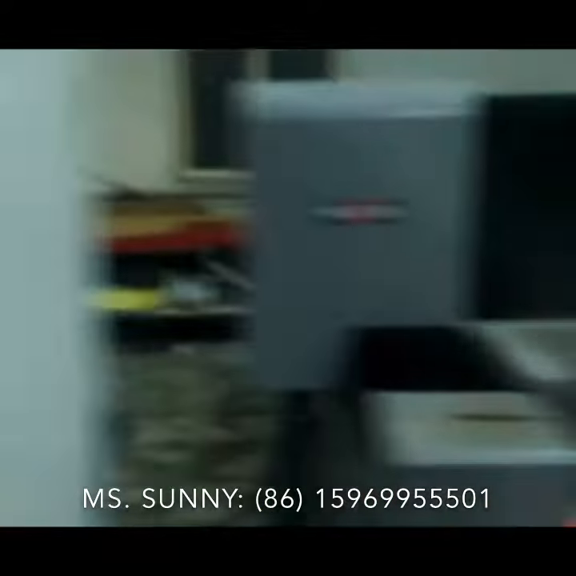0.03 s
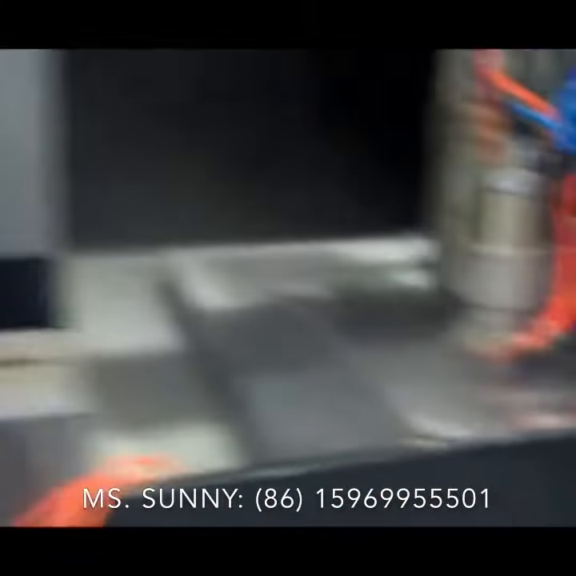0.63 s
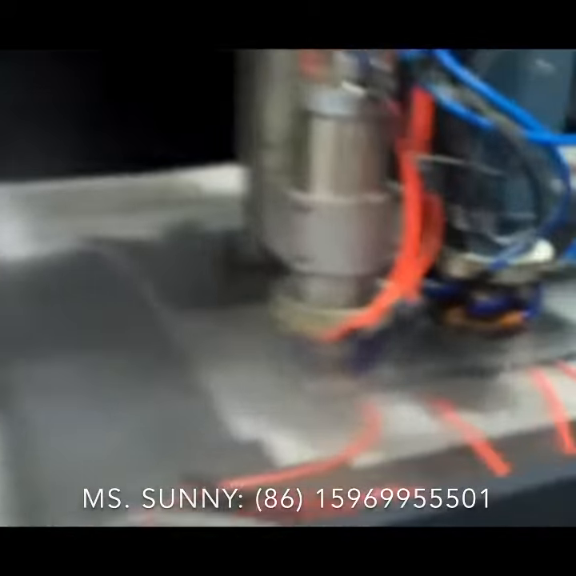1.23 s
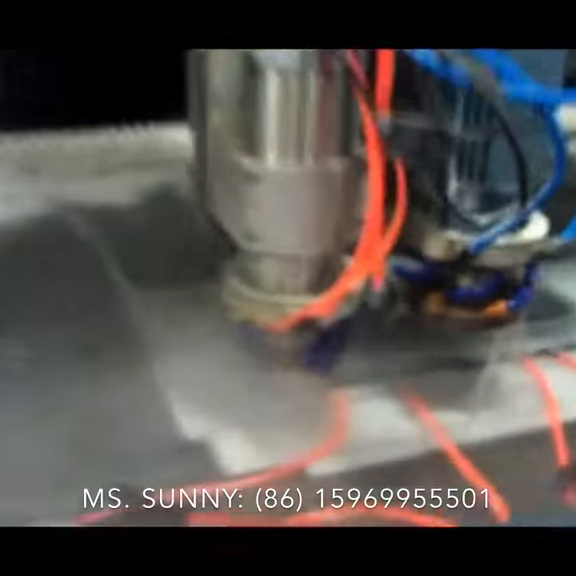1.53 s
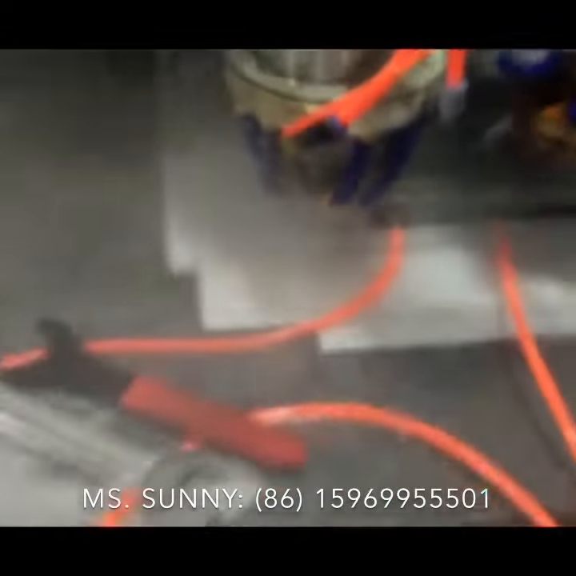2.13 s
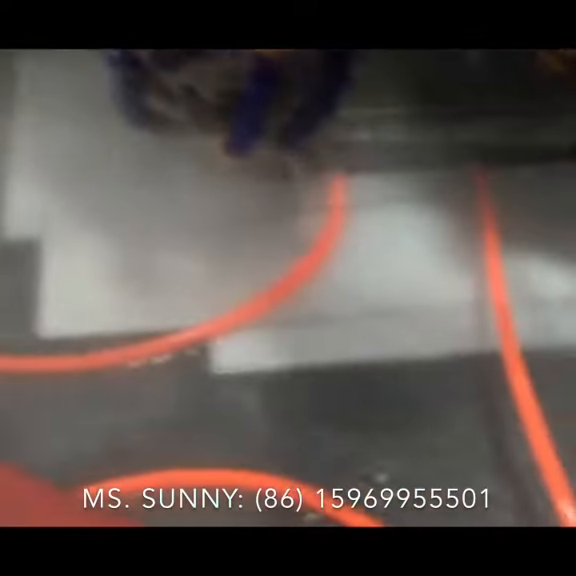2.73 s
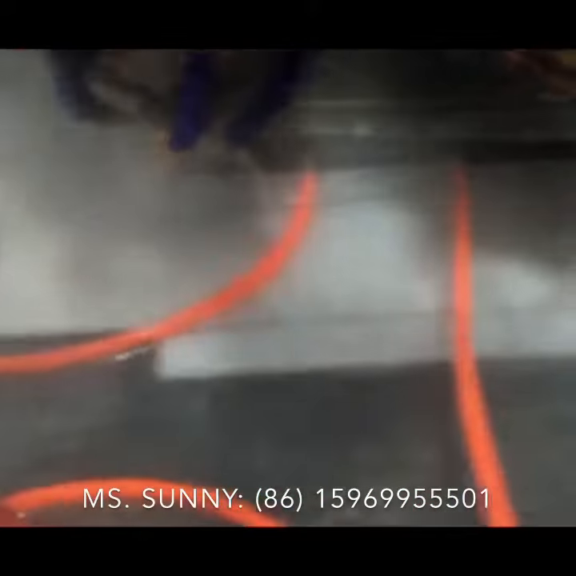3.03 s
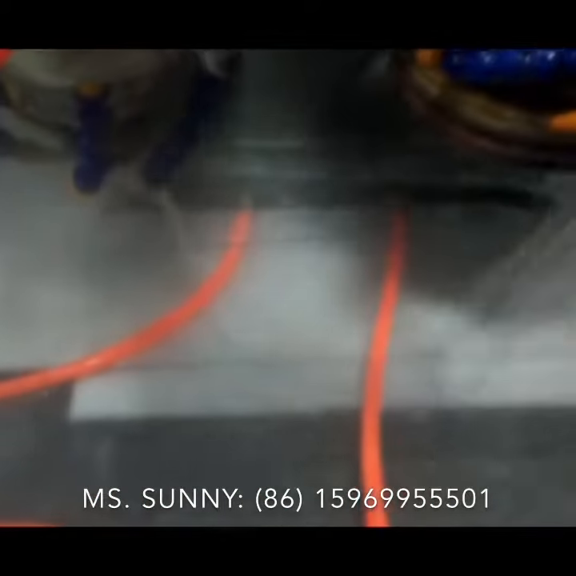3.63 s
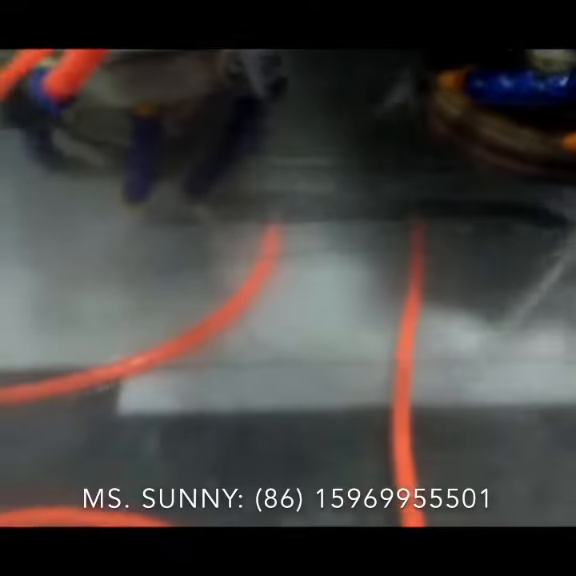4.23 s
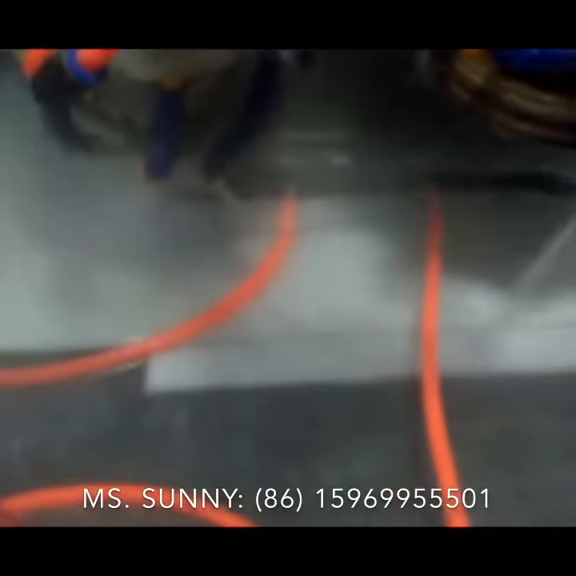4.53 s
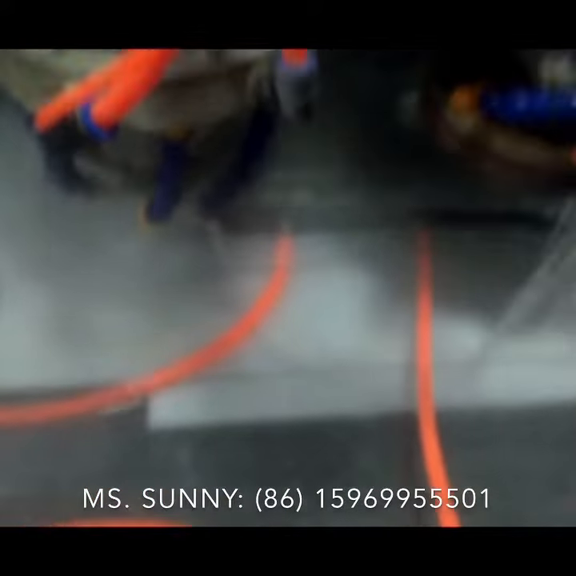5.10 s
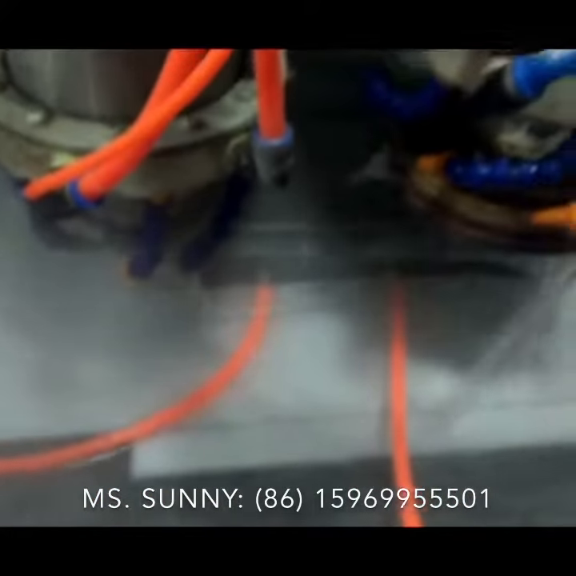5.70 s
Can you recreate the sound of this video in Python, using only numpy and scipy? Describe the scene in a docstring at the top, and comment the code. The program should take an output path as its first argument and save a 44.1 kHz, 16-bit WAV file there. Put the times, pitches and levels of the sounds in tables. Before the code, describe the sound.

A waterjet cuts a glass sheet in a workshop, heard for about six seconds through a hand-held microphone moving in towards the cutting head. A loud, bright hiss runs from start to end, becoming fuller and sharper between 0.2 and 0.8 seconds. Many narrow, high whistles flutter within it, and single ones swell into squeals at different pitches, most clearly around 0.2, 0.9, 1.4 and 2.2 seconds, again near 3.8, and in a cluster from 5 seconds on. Spent water churns under the sheet, faint at first and rising from about 1 to 1.4 seconds, though staying below the hiss. A motor holds a mid-pitched hum with a thin, fluttering whine above it; the hum dips near 0.8 seconds, returns by 1.6 and weakens at the end. The machine frame adds a very faint low drone, swelling briefly at half a second.

```python
"""A bright hiss with narrow, squealing whistles: a waterjet cuts a glass sheet in a workshop.
The jet tears into mist and rings a ladder of resonances; its spent water churns under the sheet.
A motor hums near 400 Hz with a thin whine above it, and the machine frame drones faintly.
The balance shifts as a hand-held microphone moves in towards the cutting head."""
import sys
import numpy as np
from scipy import signal
from scipy.fft import rfft, irfft, next_fast_len
from scipy.io import wavfile
from scipy.ndimage import uniform_filter1d

SR = 44100
rng = np.random.default_rng(int(sys.argv[2]) if len(sys.argv) > 2 else 0)


def dump_mix(stems):
    """Bounce the given channels to the path in sys.argv[1] as a 16-bit WAV at rate SR."""
    frames = np.atleast_2d(stems).T  # one column per channel
    limited = np.clip(frames, -1, 1)  # hard clip at full scale
    pcm = np.round(limited * 32767).astype(np.int16)
    wavfile.write(sys.argv[1], SR, pcm)


N = 258426

MOTOR_HZ = 399.8
LADDER_BASE_HZ, LADDER_STEP_HZ = 4340, 399  # evenly spaced resonances, as in a pipe


def undb(db):
    """Decibels to gain."""
    return 10 ** (np.asarray(db) / 20)


def unit(x):
    """Scale to rms 1."""
    return x / np.sqrt(np.mean(np.abs(x) ** 2))


def curves(table):
    """Per-sample curves from rows of time in seconds, then values."""
    times_s, *columns = np.transpose(table)
    return [np.interp(np.arange(N) / SR, times_s, column) for column in columns]


def glide(from_db, to_db, start_s, length_s):
    """Level in dB: hold, ramp as the microphone moves, hold."""
    progress = np.clip((np.arange(N) / SR - start_s) / length_s, 0, 1)
    return from_db + (to_db - from_db) * progress


def drift(rate_hz):
    """Smooth random drift, rms 1."""
    position = np.arange(N) / SR * rate_hz
    knots = rng.standard_normal(1024)
    ramps = np.interp(position, np.arange(len(knots)), knots)
    return unit(uniform_filter1d(ramps, int(SR / rate_hz / 2) + 1))


def turbulence(colour, flicker_db, flicker_hz, count=12):
    """Coloured noise in independently flickering bands; returns centres in Hz and bands."""
    hz, db = np.transpose(colour)
    size = next_fast_len(N)
    log_hz = np.log(np.maximum(np.fft.rfftfreq(size, 1 / SR), 1))
    gain = undb(np.interp(log_hz, np.log(hz), db, left=-np.inf, right=-np.inf))
    spectrum = rfft(rng.standard_normal(size)) * unit(gain)
    log_centres = np.linspace(np.log(hz[0]), np.log(hz[-1]), count)
    bands = []
    for weights in np.eye(count):
        band = irfft(spectrum * np.interp(log_hz, log_centres, weights), size)[:N]
        bands.append(band * undb(flicker_db * drift(flicker_hz)))
    return np.exp(log_centres), bands


def ring(hz, width_hz):
    """Noise-driven resonance: a complex wave whose real part has rms 1."""
    pole = np.exp((2j * np.pi * hz - np.pi * width_hz) / SR)
    return np.sqrt(2) * unit(signal.lfilter([1], [1, -pole], rng.standard_normal(N)))


def frame_drone(swell_at_s=0.45, swell_half_s=0.1, swell_db=-40):
    """The machine frame drones faintly; its lowest note swells once."""
    # Each row: frequency in Hz, width in Hz, level in dB.
    modes = [(100.2, 22, -47.5), (181.3, 8, -47)]
    t = np.arange(N) / SR
    envelope = undb(swell_db) * np.exp(-((t - swell_at_s) / swell_half_s) ** 2)
    swell = envelope * np.sin(2 * np.pi * modes[0][0] * t)
    return swell + sum(undb(db) * ring(hz, width_hz).real for hz, width_hz, db in modes)


def motor(whine_trim_db=-1, waver_db=1.8, flutter_db=1.5):
    """Clean hum with locked overtones; harmonics 6 and 12 make the fluttering whine."""
    # Hum along the microphone's path. Each row: time in seconds, level in dB.
    hum_levels = [(0.0, -20), (0.08, -19), (0.77, -28), (1.6, -21.5), (4.39, -22), (4.63, -21), (5.5, -24),
                  (5.86, -31.5)]
    # Each row: time in seconds, lower and upper whine in dB before trim.
    whine_levels = [(0, -37, -19.5), (.5, -40, -27.5), (1.0, -32, -32), (1.5, -34.5, -23.5),
                    (2.8, -38, -37), (3.6, -37, -21.5), (4.6, -32, -27.5), (5.2, -29.5, -29),
                    (5.86, -40, -25)]
    # Each row: harmonic number, level in dB.
    overtones = [(3, -38.5), (4, -46)]
    lower_db, upper_db = curves(whine_levels)
    octave_db = glide(-27.5, -40, start_s=0.6, length_s=0.84)  # the microphone leaves it behind
    phase = 2 * np.pi * np.cumsum(MOTOR_HZ + 0.109 * drift(2.99)) / SR
    partials = [(1, curves(hum_levels)[0]), (2, octave_db)]
    partials += [(k, db + waver_db * drift(4)) for k, db in overtones]
    for k, db in [(6, lower_db), (12, upper_db)]:
        partials.append((k, db + whine_trim_db + flutter_db * drift(25)))
    return np.sqrt(2) * sum(undb(db) * np.sin(k * phase + 2 * np.pi * rng.random()) for k, db in partials)


def churn():
    """The spent jet stirs the water under the sheet."""
    # Each row: frequency in Hz, relative spectral density in dB.
    colour = [(25, -29), (45, -20), (65, -9.5), (100, -3), (140, -2.5), (230, -3), (360, 0), (550, -1.5),
              (1000, -2), (1700, -3), (2650, 0.5), (3300, -5.5), (4500, -38)]
    _, bands = turbulence(colour, flicker_db=1.5, flicker_hz=18)
    return sum(bands)


def beam_gain(hz, peak_db, centre_hz=8300, spread_hz=1900):
    """One band leaves the nozzle in a beam, so its gain depends on the angle to the microphone."""
    return undb(peak_db * np.exp(-((hz - centre_hz) / spread_hz) ** 2))


def spray(treble_db, comb_db=1.24):
    """Hiss of the jet tearing into mist, lightly coloured by the resonance ladder."""
    # Each row: frequency in Hz, relative spectral density in dB.
    colour = [(1200, -18.5), (2000, -14.5), (2600, -10), (3050, -2), (3600, -1), (4400, 0.5), (5600, -1),
              (7000, -0.4), (8300, -3), (9400, -1), (10300, -6), (11400, -10), (12000, -23)]
    centres_hz, bands = turbulence(colour, flicker_db=0.55, flicker_hz=32)
    low_db = glide(-4, 1.5, start_s=0.2, length_s=0.1)  # low hiss fills in on the approach
    mist = sum(band * beam_gain(hz, treble_db) * beam_gain(hz, low_db, centre_hz=2500, spread_hz=600)
               for hz, band in zip(centres_hz, bands))
    size = next_fast_len(N)
    rung = (np.fft.rfftfreq(size, 1 / SR) - LADDER_BASE_HZ) / LADDER_STEP_HZ
    comb = undb(comb_db * np.cos(2 * np.pi * rung))
    return irfft(rfft(mist, size) * comb, size)[:N]


def whistles(treble_db, width_hz=24, wander_db=1.0, flutter_db=1.7, wobble_hz=9, focus=1.5):
    """The jet rings resonances that swell and flutter singly; unsteady flow bends them all together."""
    # Base level in dB of each resonance, lowest first.
    levels_db = [-33, -32, -29.5, -29.5, -27, -25, -26, -23, -25, -25.5, -27, -26, -23.5, -26, -28, -34,
                 -39, -40, -42]
    # One whistle takes over. Each row: peak time in seconds, pitch in Hz, rise in dB,
    # half length in seconds.
    squeals = [(.2, 4739, 10, .18), (.25, 5936, 8, .11), (.85, 5936, 11, .3), (1.1, 9128, 5, .4),
               (1.38, 4739, 8, .1), (2.15, 6734, 7, .25), (2.8, 6734, 5, .24), (3.7, 4739, 5, .35),
               (3.95, 8729, 6, .21), (4.98, 9128, 6, .12), (5.27, 9527, 7, .14), (5.5, 4739, 7, .35),
               (5.6, 5936, 6, .3)]
    t = np.arange(N) / SR
    pitches_hz = LADDER_BASE_HZ + LADDER_STEP_HZ * np.arange(len(levels_db))
    bend = np.exp(2j * np.pi * np.cumsum(wobble_hz * drift(25)) / SR)
    out = np.zeros(N)
    for hz, db in zip(pitches_hz, levels_db):
        squeal_db = sum(rise_db * np.exp(-((t - peak_s) / half_s) ** 2)
                        for peak_s, squeal_hz, rise_db, half_s in squeals
                        if abs(squeal_hz - hz) < LADDER_STEP_HZ / 2)
        unsteady_db = wander_db * drift(6) + flutter_db * drift(45)
        # from one small spot, beamed more sharply than the mist
        gain = undb(db + squeal_db + unsteady_db) * beam_gain(hz, focus * treble_db)
        out += gain * (ring(hz, width_hz) * bend).real
    return out


def scene(spray_db=-14.5, buzz_depth=0.035):
    """Jet, water, motor and frame at one moving microphone."""
    # Jet strength, driving hiss and churn. Each row: time in seconds, gain in dB.
    strength = [(0, 0.05), (2.4, 0.3), (4.0, -.2), (5.1, -0.8), (5.8, .4)]
    strength_db = curves(strength)[0]
    treble_db = glide(-2.2, 1.1, start_s=0.2, length_s=0.55)  # round the cabinet, into the beam
    water_db = glide(-32.5, -23, start_s=0.92, length_s=0.45)  # over the tank's rim
    jet = undb(spray_db + strength_db) * spray(treble_db) + whistles(treble_db)
    jet *= 1 + buzz_depth * np.sin(2 * np.pi * MOTOR_HZ * np.arange(N) / SR)  # motor vibration
    water = undb(water_db + strength_db) * churn()
    mono = jet + water + motor() + frame_drone()
    return np.array([mono, mono])


def record(dry, ceiling=0.9, cutoff_hz=12000):
    """Clip the highest peaks, then low-pass."""
    lowpass = signal.ellip(10, 0.1, 50, cutoff_hz, fs=SR, output="sos")
    return signal.sosfiltfilt(lowpass, np.clip(dry, -ceiling, ceiling))


dry = scene()
out = record(dry)
dump_mix(out)
```